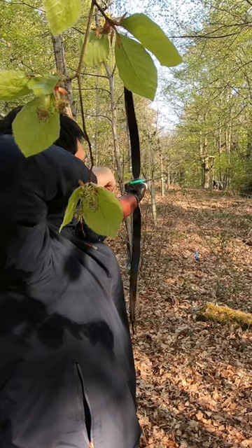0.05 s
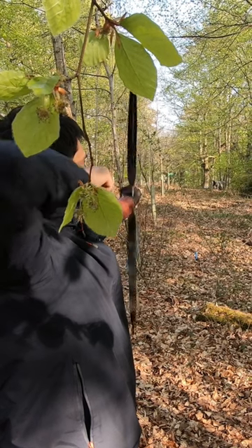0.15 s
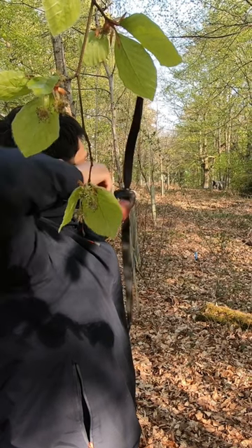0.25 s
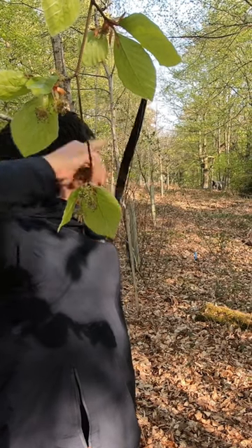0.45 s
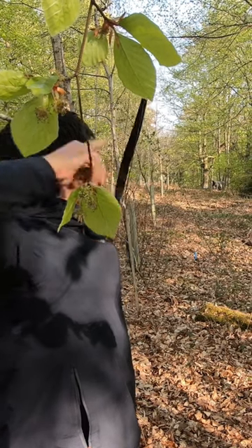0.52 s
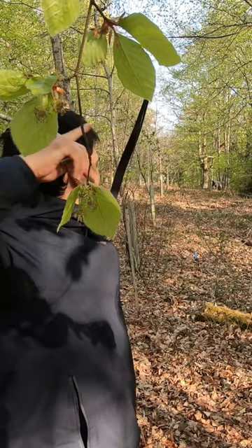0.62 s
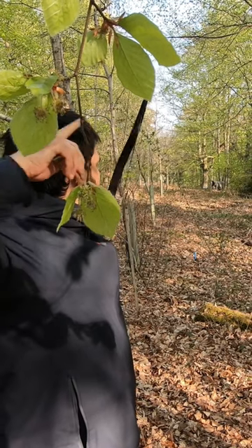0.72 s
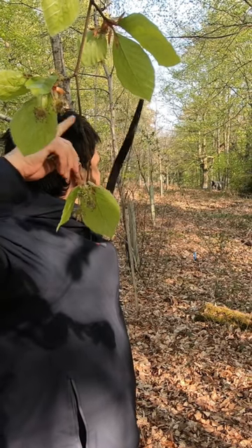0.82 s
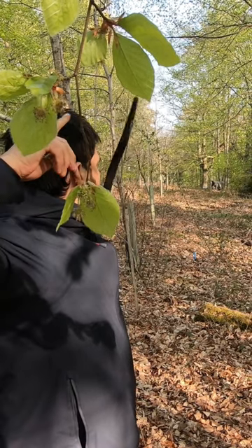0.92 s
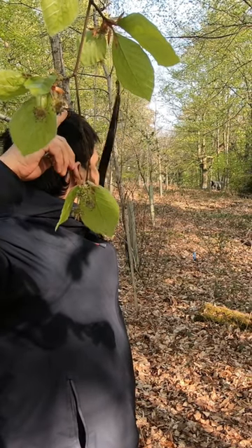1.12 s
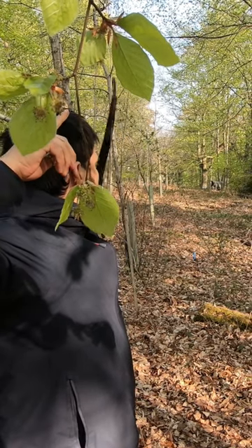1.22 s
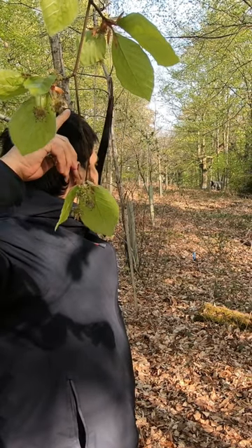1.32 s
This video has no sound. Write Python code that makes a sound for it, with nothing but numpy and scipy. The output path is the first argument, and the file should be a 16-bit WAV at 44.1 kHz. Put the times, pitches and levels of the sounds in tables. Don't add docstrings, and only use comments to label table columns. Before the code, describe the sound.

A bow shot in slow motion: dull thump, woody slap and knocks, then a fading rustling echo

```python
import sys
import numpy as np
from scipy import signal
from scipy.fft import rfft, irfft
from scipy.io import wavfile
from scipy.ndimage import uniform_filter1d

SR = 44100
rng = np.random.default_rng(int(sys.argv[2]) if len(sys.argv) > 2 else 0)


def generate_wav(sig):
    pcm = np.round(np.clip(np.atleast_2d(sig).T, -1, 1) * 32767).astype(np.int16)
    wavfile.write(sys.argv[1], SR, pcm)


def natural_amplitude(level_db):
    exponent = np.asarray(level_db, float) / 20
    return 10 ** exponent


N = 59535


def read_log(table, hz):
    table = np.array(table)
    return np.interp(np.log(np.maximum(hz, 1)), np.log(table[:, 0]), table[:, 1])


# [crest_s, peak_db, pitch_hz, length_cycles]
KNOCKS = [(.192, -38, 1410, 1.9), (0.2006, -29.5, 1480, 1.4), (0.217, -33, 2000, 1.6),
          (.242, -30.5, 674, 3.3), (0.2103, -33.5, 380, 1.4), (.214, -27.5, 830, 1.6),
          (.2225, -25, 800, 1.1), (.2255, -14, 189, 0.26), (.231, -17.5, 209, 0.36), (.233, -24, 800, 1.2),
          (.238, -24, 318.4, 1.6), (.248, -33, 864, 1.3), (0.264, -20.5, 446, 1.7),
          (.2748, -19.5, 815, 0.66), (0.2794, -10.5, 1500, 2.7), (.2848, -15, 893, 1.8),
          (0.2835, -23, 2020, 2.2), (.291, -12, 503.4, 1.05), (0.2939, -14, 1352, 1.4),
          (0.2986, -21.5, 1565, 1.3), (.3032, -12, 796, 3.3), (0.305, -19.5, 2040, 4.3),
          (0.3064, -19, 950, 2.7), (.3085, -8, 902, 1.3), (.312, -16.5, 344.6, 1.3),
          (0.321, -26, 1540, 3.1), (.327, -28, 784, 1), (.349, -21, 278, .7), (0.366, -21.5, 874, 3),
          (0.386, -32.5, 1500, 0.7)]
# [crest_s, peak_db, pitch_hz, length_cycles]
TICKS = [
    (.030, -54, 915, 0.5),
    (.135, -45, 2010, 2.1),
    (.71, -39, 870.5, 2.05),
    (.9655, -34, 795, 0.56),
]
# [pitch_hz, level_db]
BODY_RINGS = [(185, -2), (260, -6.5), (350, -8.5), (440, -7.5), (680, 6), (805, 3), (940, 5), (1040, -8),
              (1340, 12), (1510, 15.5), (1980, -12)]
# [pitch_hz, lead_radians]
PORT_LEAD = [(300, 0.43), (800, 0.13), (1000, -1.2), (1460, -1.53), (1750, -3), (2100, -19.1)]
# [pitch_hz, left_minus_right_db]
KNOCK_PAN = [(200, -0.5), (800, 0.7), (1500, -4), (2000, 5.2)]


def bow_knocks():
    reach_octaves = 0.32
    out = np.zeros((2, N))
    t = np.arange(int(0.08 * SR)) / SR
    ring_hz, ring_db = np.array(BODY_RINGS).T[:, :, None]
    half_lead = read_log(PORT_LEAD, ring_hz) / 2
    half_pan_db = read_log(KNOCK_PAN, ring_hz) / 2
    events = [*KNOCKS, *TICKS]
    detune = 1 + 0.015 * rng.standard_normal((len(events), len(BODY_RINGS), 1))
    for (crest_s, peak_db, pitch_hz, cycles), tuning in zip(events, detune):
        decay_s = cycles / pitch_hz
        first = int((crest_s - 2 * decay_s) * SR) + 1
        since_crest = t + first / SR - crest_s
        swell = (1 + since_crest / decay_s / 2) ** 2 * np.exp(-since_crest / decay_s)
        octaves_away = np.log2(ring_hz / pitch_hz)
        share = natural_amplitude(ring_db) * np.exp(-(octaves_away / reach_octaves) ** 2)
        phase = 2 * np.pi * ring_hz * tuning * since_crest
        for port, side in enumerate((1, -1)):
            rings = share * natural_amplitude(side * half_pan_db) * np.cos(phase + side * half_lead)
            knock = natural_amplitude(peak_db) * swell * rings.sum(0) / share.sum()
            out[port, first:first + len(t)] += knock
    return out


# [start_s, pitch_hz, peak_db, rise_s, fade_60db_s]
LIMBS = [
    (0.214, 51, -20, .004, 0.2),
    (0.259, 78, -24.5, 0.0022, 0.16),
    (0.2989, 25.8, -13.5, 0.0098, 0.65),
    (.331, 52.4, -22.5, 0.005, 0.57),
    (0.33, 82.02, -30.5, 0.016, 1.5),
    (0.3406, 86, -34, 0.0075, 0.99),
    (0.302, 29.14, -28, 0.035, 1.04),
    (0.345, 178.8, -25, 0.0041, 0.17),
]


def limb_swings():
    out = 0
    for start_s, hz, peak_db, rise_s, fade_s in LIMBS:
        t = np.maximum(np.arange(N) / SR - start_s, 0)
        level = natural_amplitude(peak_db - 60 * t / fade_s) * (1 - np.exp(-t / rise_s))
        out = out + level * np.sin(2 * np.pi * hz * t)
    left_minus_right_db = -1.6
    return out * natural_amplitude(np.array([[left_minus_right_db], [-left_minus_right_db]]) / 2)


def slow_wander(changes_per_s):
    k = int(SR / changes_per_s)
    steps = np.repeat(rng.standard_normal(N // 50 + 1)[:N // k + 1], k)
    smooth = uniform_filter1d(uniform_filter1d(steps, k), k)[:N]
    return smooth / smooth.std()


# [pitch_hz, width_hz, depth_db]
HOUSING_DIPS = [(518.5, 104, -5.5), (1196, 185, -7), (1730, 115, -9)]
# [pitch_hz, left_right_correlation]
LIKENESS = [(40, 0.87), (150, 0.74), (500, 0.76), (900, 0.81), (1400, 0.019), (2600, 0.084)]


def surround(make, colour, spread, dips):
    hz = np.arange(N // 2 + 1) * SR / N
    dip_db = sum(depth * np.exp(-((hz - centre) / width) ** 2) for centre, width, depth in HOUSING_DIPS)
    gain = natural_amplitude(read_log(colour, hz) + dips * dip_db)
    like = np.clip(1 - spread * (1 - read_log(LIKENESS, hz)), 0, 1)
    mid = rfft(make()) * gain * np.sqrt(1 + like)
    side = rfft(make()) * gain * np.sqrt(1 - like)
    both = np.array([mid + side, mid - side])
    octave = np.log2(np.maximum(hz, 1))
    out = 0
    for centre in range(4, 13):
        share = np.cos(np.pi / 2 * np.clip(octave - centre, -1, 1)) ** 2
        flicker = natural_amplitude(0.8 * slow_wander(22))
        out = out + irfft(both * share, N) * flicker
    return out / np.sqrt(np.mean(out ** 2))


def scatter():
    taps_per_s, size_spread_db = 6000, 1.3
    chance, size = rng.random((2, N))
    tap_here = chance < taps_per_s / SR
    return rng.standard_normal(N) * tap_here * natural_amplitude(-size_spread_db * np.log(1 - size))


# [time_s, level_db]
SCRAPE = [
    (.178, -55.5),
    (.2, -38.5),
    (.218, -30),
    (.245, -28.5),
    (.265, -35.5),
    (.28, -23),
    (.308, -19.5),
    (.33, -29),
    (.37, -65.5),
]
# [pitch_hz, level_db]
RUSTLE = [(25, -23.5), (130, -3), (400, -8.5), (800, -5), (1500, -6), (2050, -19.5), (2600, -34.5),
          (3300, -46)]


def scrape():
    time_s, level_db = np.array(SCRAPE).T
    level = natural_amplitude(np.interp(np.arange(N) / SR, time_s, level_db))
    return level * surround(scatter, RUSTLE, 0.83, 2.2)


def wood_echoes():
    t = np.maximum(np.arange(N) / SR - 0.32, 0)
    near_db, near_fade_s = -21, 0.29
    far_db, far_fade_s = -32.5, 2.774
    near = natural_amplitude(near_db - 60 * t / near_fade_s)
    far = natural_amplitude(far_db - 60 * t / far_fade_s)
    fade = np.hypot(near, far) * (1 - np.exp(-t / 0.019))
    return fade * surround(scatter, RUSTLE, 1.0, 0.69)


# [pitch_hz, level_db]
BREEZE = [(25, 1.5), (60, -2), (170, 0.5), (330, -7.5), (500, -17), (900, -18.5), (2000, -30), (3300, -71)]


def breeze():
    return natural_amplitude(-49) * surround(lambda: rng.standard_normal(N), BREEZE, 0.8, 1.6)


# [trough_s, pitch_hz, peak_db, half_length_s]
GUSTS = [(0.209, 13, -40.5, 0.082), (0.057, 14, -45, 0.056), (0.466, 9.6, -39, 0.062),
         (0.641, 13, -41, 0.045), (0.806, 19, -38.5, 0.042), (0.983, 13, -45, .07),
         (1.164, 13, -38.5, 0.03), (1.248, 11, -35, 0.06)]


def gusts():
    t = np.arange(N) / SR
    out = 0
    for trough_s, hz, peak_db, half_s in GUSTS:
        swell = natural_amplitude(peak_db) * np.exp(-((t - trough_s) / half_s) ** 2)
        out = out - swell * np.cos(2 * np.pi * hz * (t - trough_s))
    return out


def scene():
    return bow_knocks() + limb_swings() + scrape() + wood_echoes() + breeze() + gusts()


def band_limit(x):
    return signal.sosfilt(signal.butter(12, 15830, fs=SR, output="sos"), x)


def record(dry):
    slowdown, first = 5, 1
    k = np.arange(N)
    dull = signal.sosfiltfilt(signal.butter(8, 3300, fs=SR, output="sos"), dry)
    slow = np.array([np.interp(k, k[first::slowdown], port[first::slowdown]) for port in dull])
    top_cut = signal.ellip(10, 0.1, 60, 15830, fs=SR, output="sos")
    mix = signal.sosfiltfilt(top_cut, slow)
    return band_limit(mix)


dry = scene()
out = record(dry)
generate_wav(out)
```